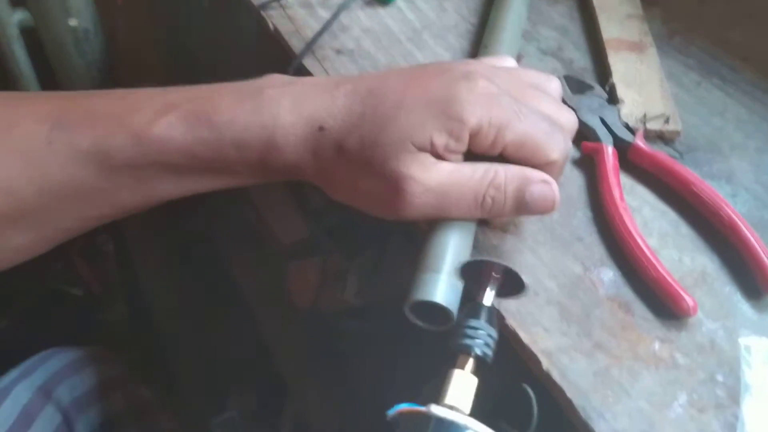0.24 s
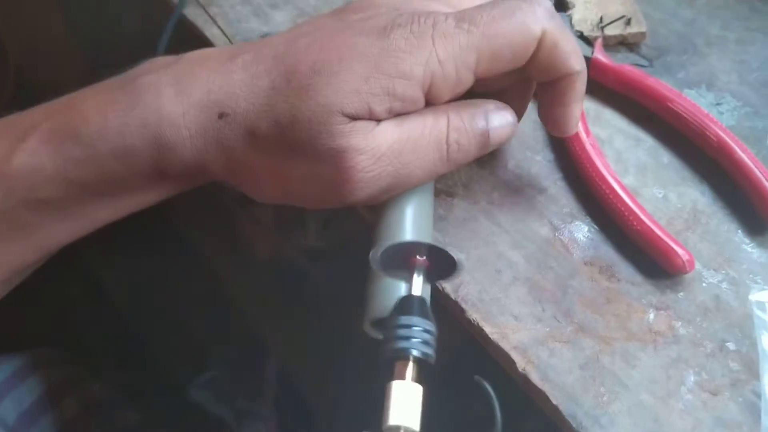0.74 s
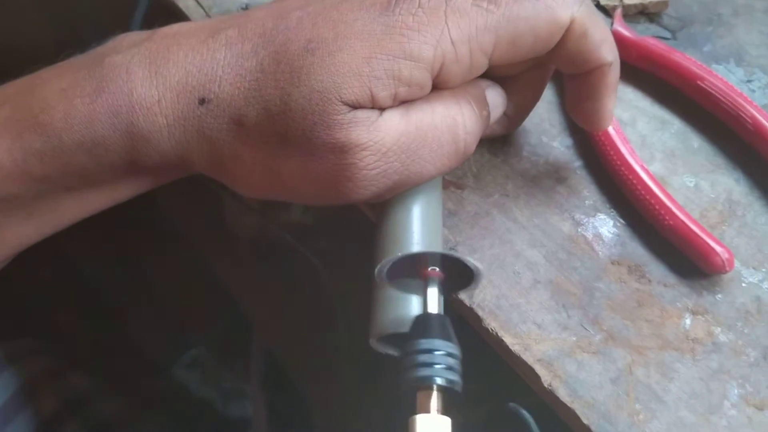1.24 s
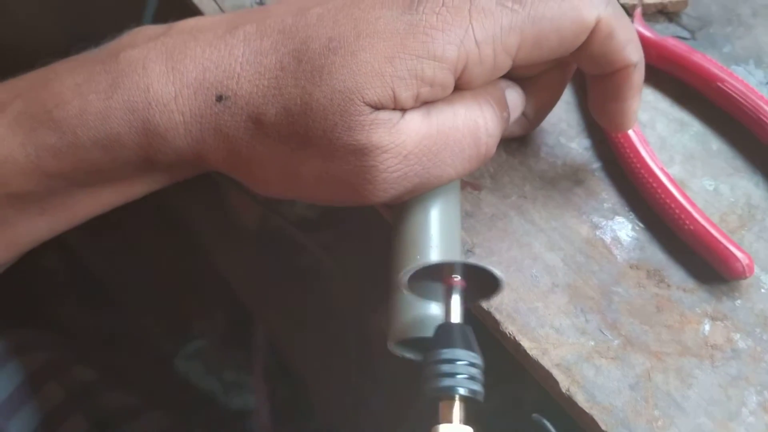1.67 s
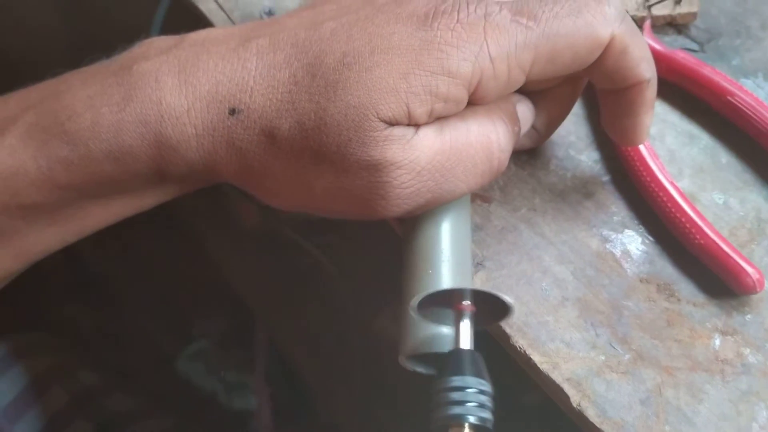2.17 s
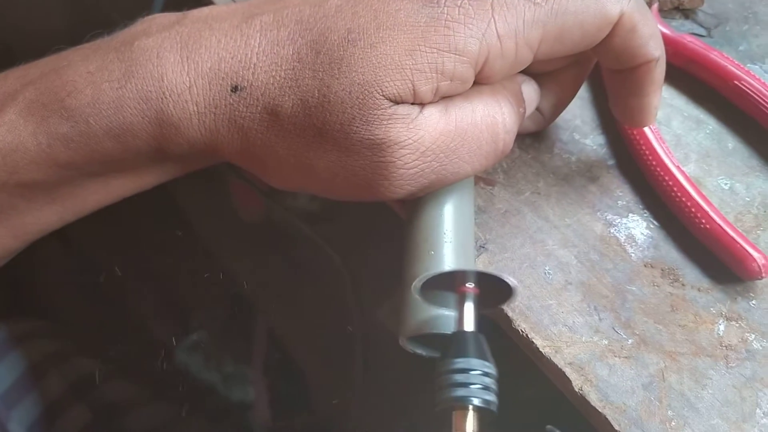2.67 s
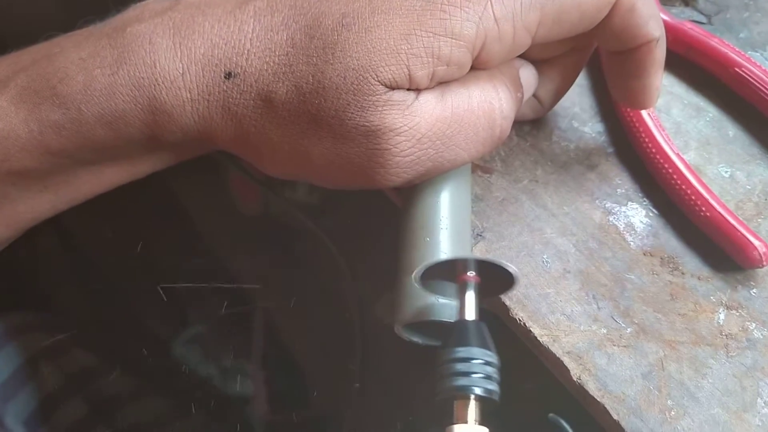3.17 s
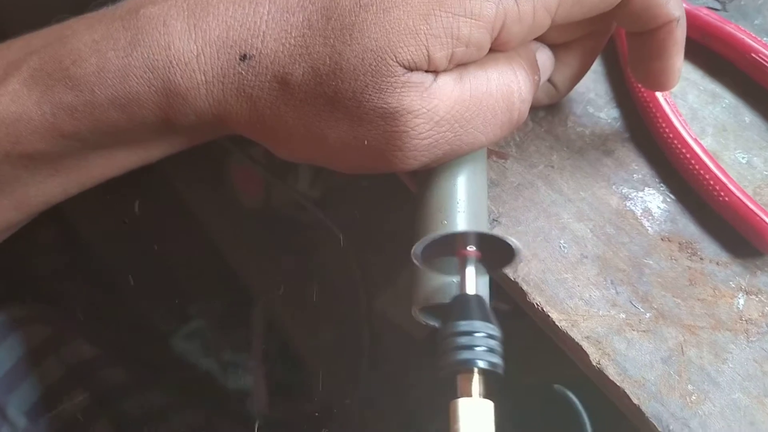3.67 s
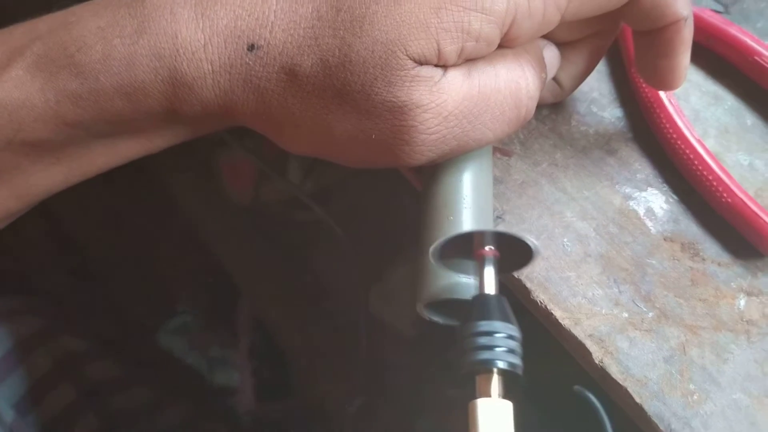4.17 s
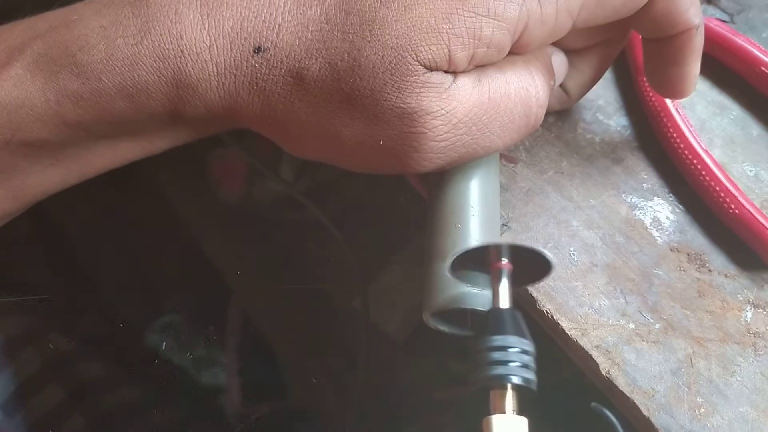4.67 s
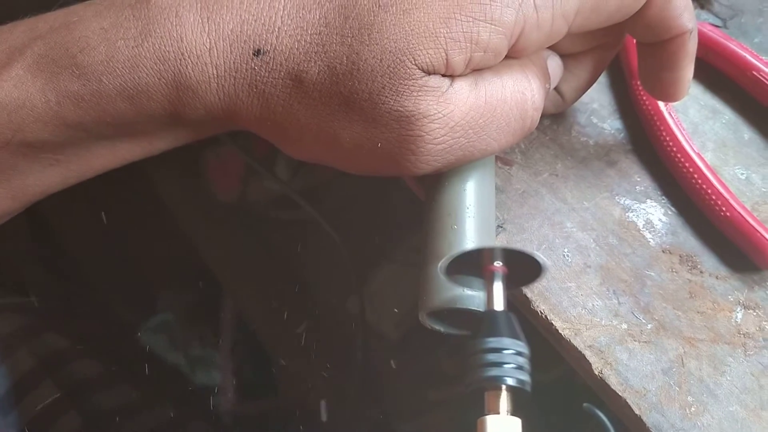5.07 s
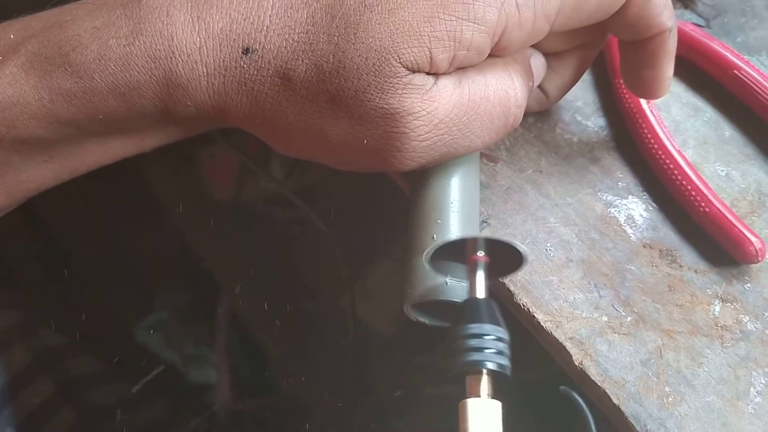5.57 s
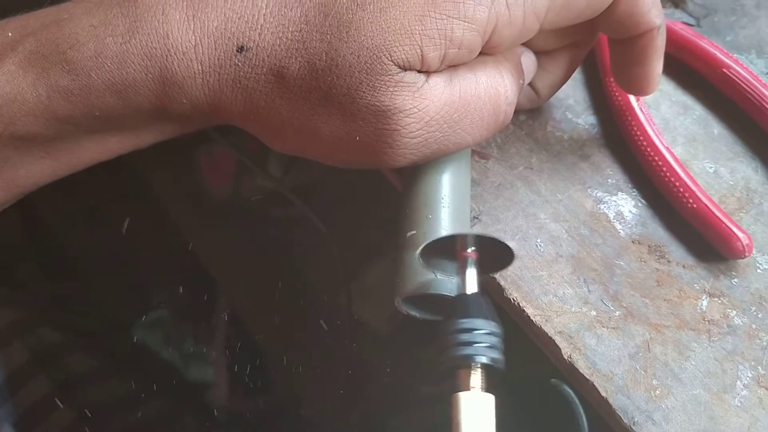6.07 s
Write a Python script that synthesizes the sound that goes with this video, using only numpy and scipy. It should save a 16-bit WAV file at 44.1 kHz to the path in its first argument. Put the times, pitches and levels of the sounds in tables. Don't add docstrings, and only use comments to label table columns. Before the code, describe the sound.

Steady motor brush whine and light handling knocks come first, close to a phone in a small hard room. A quick scraping touch leads to a harsh cut: dozens of sharp bites a second, shrill metallic rim squeal over the hollow knocking of plastic pipe. It sags in pitch, breaks into irregular clatter, then whines freely for a moment before a longer, louder grinding cut that ends bouncing.

```python
import sys
import numpy as np
from scipy import signal
from scipy.fft import rfft, irfft, next_fast_len
from scipy.io import wavfile
from scipy.ndimage import uniform_filter1d, minimum_filter1d, map_coordinates

SR = 44100
rng = np.random.default_rng(int(sys.argv[2]) if len(sys.argv) > 2 else 0)


def elevation(decibels):
    levels = np.asarray(decibels, float)
    return 10 ** (levels / 20)


def materialize(psi):
    bounded = np.clip(np.atleast_2d(psi).T, -1, 1)
    quanta = np.round(bounded * 32767).astype(np.int16)
    wavfile.write(sys.argv[1], SR, quanta)


N = 279153
TIME = np.arange(N) / SR
FREE_SPEED = 74

# start_s, speed [turns per s]
CUT_SPEEDS = [
    [(2.29, 69.94), (2.38, 74.52), (2.58, 69.6), (2.96, 61.61), (3.17, 53.29), (3.23, 43)],
    [(3.58, 54.6), (3.65, 69.33), (3.725, 71.91)],
    [(4.205, 73.47), (4.345, 72.57)],
    [(4.38, 79.19), (4.54, 69.4), (4.99, 57.71), (5.38, 56.43), (5.46, 67.45), (5.64, 56.25), (5.76, 47.67),
     (5.806, 49.3)],
]
# start_s, slot_ring_db, chip_hiss_db, lean_left_db
SLOT_MOVES = [(1.88, -2.5, 3, -0.5), (2.3, -2.5, 0, 0), (2.55, -4.5, 1, 1.5), (2.75, -0.5, -0.5, 1),
              (2.95, 0, 0.5, 1.5), (3.15, -1, -2, 0), (3.35, -14, -0.5, 0), (3.55, -1, 0, -1),
              (3.8, 0, 1.5, 2), (4.25, 7.5, -5, 0.5), (4.55, 1, 2.5, 0), (4.75, 6.5, 0, -2.5),
              (5.15, 2, -1, 1), (5.35, 5.5, 1, 0), (5.55, -1, 1, 1.5), (5.75, -5.5, 0, 0.5),
              (6.1, -5, 3, 0), (6.3, -1, 6, 1)]


def unit(x):
    return x / np.sqrt(np.mean(x ** 2) + 1e-20)


def along(points, hz):
    f, v = np.transpose(points)
    return np.interp(np.log(hz + 1), np.log(f + 1), v)


def wobble(rate):
    return map_coordinates(rng.standard_normal(int(N * rate / SR) + 4), [TIME * rate])


def filtered(x, response):
    m = next_fast_len(N + SR // 2)
    return irfft(rfft(x, m) * response(np.fft.rfftfreq(m, 1 / SR)), m)[..., :N]


def resonate(x, modes):
    def shape(f):
        total = 0
        for k, (centre, width, db) in enumerate(modes):
            damping = max(width, centre / 36 * (centre < 11000))
            total = total + (-1) ** k * elevation(db) * 1j * f * width / (centre ** 2 - f ** 2 + 1j * f * damping)
        return total
    return filtered(x, lambda f: shape(f) / np.sqrt(np.mean(abs(shape(f)) ** 2)))


def shaft():
    # start_s, speed [turns per s]
    idle = [(0, 74.83), (1.87, 74.78), (1.93, 73.6), (2.1, 74.65), (2.28, 74.75), (3.5, 50), (3.9, 74.6),
            (4.19, 74.9), (6.33, 46)]
    return np.interp(TIME, *np.transpose(sorted(idle + sum(CUT_SPEEDS, []))))


def ports(x, send):
    # pitch_hz, left_minus_right_db
    lean = [(60, 13.5), (130, -3), (290, 4), (600, -3), (1300, 3.5), (2600, 6.5), (5000, 2), (8400, 1),
            (12000, 2.5)]
    # pitch_hz, left_lead [rad]
    lead = [(100, 0), (1030, -.1), (1980, -1.3), (2930, -.5), (4000, -2.5), (5250, -2.7), (7240, .2),
            (8530, 0), (11200, -1.5)]
    # pitch_hz, t60_s
    room = [(200, 1), (1000, 0.53), (3000, 0.48), (8000, 0.34), (14000, 0.045)]
    half = np.array([[.5], [-.5]])
    direct = filtered(x, lambda hz: elevation(half * along(lean, hz)) * np.exp(1j * half * along(lead, hz)))
    hz, t, z = signal.stft(rng.standard_normal((3, 2, SR // 2)), SR, nperseg=256)
    late_tail = elevation(-60 * t / along(room, hz)[:, None])
    bench_echoes = elevation(10.5 - 60 * t / 0.024)
    side = elevation(half[:, :, None] * along(lean, hz)[:, None])
    tails = signal.istft(z * (late_tail + bench_echoes) * side, SR, nperseg=256)[1]
    tails = tails / np.sqrt(np.sum(tails ** 2) / 6)
    paths = np.array([wobble(6) for _ in tails])
    sends = np.pad(send * paths / np.linalg.norm(paths, axis=0), ((0, 0), (60, 0)))
    echoes = signal.fftconvolve(sends[:, None], tails, axes=2).sum(axis=0)
    return direct + echoes[:, :N]


def air():
    # pitch_hz, level [dB per Hz]
    hush_colour = [(12, -30), (20, 7.5), (150, -3), (400, -9.5), (900, -17), (1400, -17.5), (4000, -11.5),
                   (8400, -17.5), (12400, -40), (15500, -47)]
    # start_s, level_db
    puff_list = [(0.02, -52), (.54, -56), (1.02, -52), (1.85, -62), (2.75, -47), (3.0, -38), (3.4, -41),
                 (3.631, -39), (4.23, -47), (4.48, -48), (4.74, -53), (4.93, -38.5), (5.18, -48),
                 (5.48, -37), (5.59, -45), (6.02, -42)]
    draught_colour = [(12, -52), (25, 3.0), (60, 10.5), (110, 1.0), (200, -3.0), (400, -120)]  # Hz, dB
    hiss = rng.standard_normal((2, N)) + 1.45 * rng.standard_normal(N)
    hush = unit(filtered(hiss, lambda hz: elevation(along(hush_colour, hz))))
    low = rng.standard_normal((2, N)) + 3.6 * rng.standard_normal(N)
    draught = unit(filtered(low, lambda hz: elevation(along(draught_colour, hz))))
    steady = elevation(-61 + .2 * (FREE_SPEED - shaft()) + 2 * wobble(14))
    puff_s = .02
    puffs = sum(elevation(db) * np.exp(-((TIME - s) / puff_s) ** 2) for s, db in puff_list)
    return elevation(-54.5) * hush + (steady + puffs) * elevation(np.array([[1.5], [-1.5]])) * draught


def bench():
    # start_s, peak_db, pitch_hz, t60_s, crack_db (against the ring)
    knocks = [(0.036, -42, 362.5, 0.25, 9.5), (0.07, -43.5, 343, 0.15, -10),
              (0.084, -33, 2610, 0.0092, -1.5), (0.471, -59, 315, 0.31, 23),
              (.556, -25.5, 9150, 0.011, -18), (.556, -31.5, 7000, 0.011, -18),
              (0.649, -34.5, 752, 0.054, 4), (0.912, -48, 382, 0.17, 6), (0.996, -33, 220, 0.049, -26),
              (0.995, -37.5, 2450, 0.04, -2), (1.667, -53, 210, 0.043, -3)]
    # start_s, pitch_hz, level_db
    creak_path = [
        (3.999, 795, -95),
        (4.02, 778, -51),
        (4.075, 777, -55.5),
        (4.09, 670, -54),
        (4.12, 680, -68),
    ]
    out, t = np.zeros(N + SR), np.arange(SR // 2) / SR
    for s, db, hz, t60, crack_db in knocks:
        spread = [[.075 if hz < 5000 else .025], [.3]]
        ratio, life = np.exp(rng.normal(0, spread, (2, 9))[..., None])
        ring = np.sum(np.sin(2 * np.pi * hz * ratio * t) * elevation(-2 - 60 * t / (t60 * life)), axis=0)
        noise = uniform_filter1d(uniform_filter1d(rng.standard_normal(len(t)), size=9), size=9)
        crack = noise * elevation(crack_db - 60 * t / 0.24)
        onset = (1 - np.exp(-t / (.0015 + 1.2 / hz))) ** 2
        out[round(s * SR):][:len(t)] += elevation(db) * (ring + crack) * onset
    s, hz, db = np.transpose(creak_path)
    creak_level = elevation(np.interp(TIME, s, db, -120, -120) + 1.5 * wobble(48))
    creak = creak_level * np.sin(2 * np.pi * np.cumsum(np.interp(TIME, s, hz)) / SR)
    sound = out[:N] + creak
    return ports(sound, elevation(-4.0) * sound)


def motor():
    # start_s, level_db
    whine_level = [
        [(0.0, -44.5), (0.568, -45), (1.014, -46), (1.538, -45.5), (1.86, -46.5)],
        [(2.05, -45.5), (2.28, -47.5)],
        [(3.95, -46), (4.19, -45.5)],
    ]
    # pitch_hz, level [dB per Hz]
    whine_colour = [(240, -70), (400, -50), (860, -23), (3700, -19), (4100, -14.5), (4700, -21),
                    (6500, -7.5), (8200, 1.5), (9500, -1.5), (10300, -7.5), (12500, -18), (15500, -30)]
    # shaft_order, far_db, near_db (over their neighbours, tool far or near)
    strong = [(15, 14, 20), (19, 0, 6), (20, 6, 12), (22, -4, -6), (26, -8, -1), (28, -2, -10), (30, 2, 7),
              (37, 1, -8), (38, 4, 6), (39, 1, -8), (40, -4, -8), (41, 0, 7), (42, -8, 0), (43, -4, 6),
              (44, 1, 10), (47, -11, -17), (49, 1, -10), (52, -8, -17), (54, 2, 6), (55, 11, 6), (57, 1, 9),
              (59, -13, -2), (61, -2, -7), (62, 10, 0), (63, -5, -25), (64, -5, -9), (66, 0, 7),
              (67, -11, -17), (68, 14, 7), (69, -7, -15), (70, 4, -7), (71, 9, 5), (72, -7, -19),
              (74, 8, 8), (75, -15, 0), (78, -7, -7), (79, -21, -7), (82, 4, 10), (84, -2, -15),
              (85, -27, -2), (92, -13, 1), (95, -8, -7), (96, 0, -9), (97, -11, -2), (103, 4, 6),
              (106, -5, -6), (107, -18, -1), (110, 14, 8), (114, 1, -9), (118, -3, -9), (121, -4, -11),
              (125, 4, 10), (129, 1, 6), (130, 3, 6), (134, -8, -5), (140, 3, 6)]
    # start_s, upper_whine_db
    vents = [(0, -12), (.5, -12), (.67, -5.5), (1.08, 0), (1.56, 0), (1.86, -1.5), (2.28, -2), (4.19, -1.5)]
    turns = np.cumsum(shaft()) / SR
    order = np.arange(8193)
    db = along(whine_colour, order * 73.3) + 1.5 * rng.standard_normal((3, 2, 8193))
    for k, far_db, near_db in strong:
        db[..., round(k)] += np.clip([[far_db], [near_db], [near_db]], -20, 16 if k < 30 else 10)
    phase = rng.uniform(0, 2 * np.pi, 8193)
    phase = phase + .6 * rng.standard_normal((2, 8193)) + .5 * rng.standard_normal((3, 2, 8193))
    turn = unit(irfft(elevation(db) * np.exp(1j * phase) * (order < 205)))
    place = (turns % 1 * turn.shape[-1]).astype(int)
    far_level = np.interp(TIME, [.3, .95], [14, -20])
    drift = elevation([far_level, 4 * wobble(0.085), 4 * wobble(11.0)])
    drift = drift / np.linalg.norm(drift, axis=0)
    comb = np.sum(turn[:, :, place] * drift[:, None], axis=0)
    hiss = unit(filtered(rng.standard_normal((2, N)), lambda hz: elevation(along(whine_colour, hz))))
    vent_hz, vent_width_hz = 8930, 1450
    vent = filtered(comb, lambda hz: np.exp(-((hz - vent_hz) / vent_width_hz) ** 2))
    comb = comb + (elevation(np.interp(TIME, *np.transpose(vents))) - 1) * vent
    level_db = np.interp(TIME, *np.transpose(np.vstack(whine_level)))
    return elevation(level_db + np.array([[3], [-2]])) * (comb + elevation(-9.5) * hiss)


def ping():
    # start_s, level_db
    glances = [(1.895, -39), (2.545, -25), (3.4212, -42), (3.566, -25), (3.646, -34), (3.784, -36),
               (5.445, -22)]
    ping_hz, t60_s = 7628, .35
    start, db = np.transpose(glances)[:, :, None]
    since = TIME - start
    level = np.sum((since > 0) * elevation(db - 60 * abs(since) / t60_s), axis=0)
    tone = np.sin(2 * np.pi * ping_hz * TIME + 0.44 * wobble(35))
    return level * elevation(1.5 * wobble(37)) * tone * np.ones((2, 1))


def bites():
    start_turn = (.568, -.124, .424, .164)
    # start_s, pressure_db, depth_db
    hand_moves = [
        [(2.31, -17.5, -9), (2.33, -17.5, -21.5), (2.46, -17.5, -17), (2.49, -18, -10.5), (2.56, -19, -7.5),
         (2.63, -14, -19.5), (2.86, -17, -13), (2.96, -15, -16), (3.23, -15, -15)],
        [(3.6, -17, -26), (3.65, -16, -17), (3.7, -29, -46)],
        [(4.22, -17.5, -26.5), (4.3, -18.5, -27.5), (4.34, -28, -32)],
        [(4.389, -28, -25), (4.403, -15.5, -29), (4.47, -15.5, -16), (4.55, -17, -14.5), (4.85, -16, -16.5),
         (5.02, -14.5, -23.5), (5.3, -13, -21), (5.55, -13.5, -15), (5.8, -18.5, -12)],
    ]
    # start_s, peak_db, depth_db, arc_ms
    touches = [(1.8802, -5.5, -8.5, 0.43), (1.8937, -4.5, -11.5, 1.8), (1.9078, -19, -8, 2.8),
               (3.7709, -8, -29, 0.74), (3.7826, -8, -15, 2.1), (3.7966, -36, -21, 1.9)]
    # start_s, peak_db, depth_db, arc_ms
    first_bounces = [(3.238, -5, -23, 2.3), (3.2432, -3, -14, 2.4), (3.258, -12, -12.5, 4.5),
                     (3.2652, -5, -15, 2.4), (3.281, -17, -19, 2), (3.2848, -4, -18, 3.3),
                     (3.298, -12, -12, 7.1), (3.3255, -36, -14, 2.9), (3.339, -5.5, -14.5, 2.7),
                     (3.3438, -7, -14, 1.2), (3.364, -15, -28, 3.1), (3.3787, -6.5, -13, 4.3),
                     (3.4212, -8.5, -13, 5.2), (3.4635, -7, -12.5, 3.3), (3.468, -10.5, -16.5, 3.8),
                     (3.5067, -4, -11, 2.3), (3.5465, -7.5, -12.5, 2.7), (3.5505, -11, -15, 2.5),
                     (3.564, -9.5, -23, 5.3), (3.5873, -34, -32, 2.4)]
    # start_s, peak_db, depth_db, arc_ms
    last_bounces = [(5.8141, -7.5, -18, 4.1), (5.833, -3.5, -10, 1.9), (5.855, -6, -26, 3.4),
                    (5.868, -8.5, -10.5, 4.2), (5.9062, -6, -16, 1.5), (5.9098, -12, -8, 2.9),
                    (5.928, -8.5, -17, 2.8), (5.9439, -8, -11.5, 2.6), (5.9651, -7.5, -38, 2.1),
                    (5.981, -1, -7, 0.23), (6.0013, -7, -57, 4.9), (6.017, -17, -7, 4.3),
                    (6.04, -1.5, -16, 0.78), (6.055, -10.5, -12, 4.2), (6.08, -22, -12, 1.2),
                    (6.0943, -5.5, -12.5, 2.1), (6.1184, -4, -26, 1.14), (6.1322, -11, -11, 2.3),
                    (6.164, -11.5, -23, 3.9), (6.178, -8, -23, 3.5), (6.2209, -8.5, -16.5, 5.4),
                    (6.2425, -11.5, -26, 5.9), (6.262, -6, -16, 4.1), (6.285, -2, -31, 2),
                    (6.303, -8, -20, 8.4), (6.3254, -35, -13, 2.9)]
    # start_s, level_db (over the usual bite)
    uneven = [(2.326, -2), (2.366, -2.5), (2.407, 2), (2.421, 0), (2.449, -6), (2.503, 1.5), (2.517, -1.5),
              (2.603, 0.5), (2.736, -3.5), (2.75, 1), (2.766, -4.5), (2.78, 1.5), (2.81, 1.5),
              (2.857, -0.5), (2.904, 2.5), (2.969, -4), (2.986, -1), (3.02, -2.5), (3.104, -3), (3.161, -3),
              (3.615, 2), (3.631, -0.5), (3.646, 4.5), (3.661, -1), (3.691, 1), (4.228, 1.5), (4.241, -1),
              (4.255, 1), (4.296, -0.5), (4.431, -3.5), (4.471, -0.5), (4.583, 4.5), (4.627, 3),
              (4.673, -9), (4.688, 2.5), (4.765, -1), (4.783, -2.5), (4.843, 4), (4.861, -13), (4.895, 0),
              (4.927, 0.5), (4.961, -2.0), (5.047, -1.5), (5.116, -1.5), (5.294, -3), (5.348, 1),
              (5.383, -6.5), (5.415, -9.5), (5.43, -3), (5.461, -5.5), (5.476, 0.5), (5.587, 0.5),
              (5.817, -9)]
    rows = []
    for table, load in ((touches, -1.2), (first_bounces + last_bounces, 7.9)):
        for s, db, depth_db, ms in table:
            energy_db = db - 31.5 + 10 * np.log10(ms)
            rows.append((s, energy_db, 0, depth_db, load, ms / 1000))
    for speeds, first, hand in zip(CUT_SPEEDS, start_turn, hand_moves):
        s, rate = np.transpose(speeds)
        t = TIME[(TIME > s[0]) & (TIME < s[-1])]
        turns = first + np.cumsum(np.interp(t, s, rate)) / SR
        middle = np.interp(np.arange(1, int(turns[-1]) + 1), turns, t)
        speed = np.interp(middle, s, rate)
        load = np.clip(FREE_SPEED - speed, 0, 30)
        luck = rng.standard_normal((len(middle), 3)) * np.clip(.5 + load / 16, 0, 1.1)[:, None]
        arc = .0026 + .00022 * load
        when, press_db, depth_db = np.transpose(hand)
        jitter_s = (.0001 + .00004 * load) * luck[:, 1]
        start = middle - arc / 2 - .0008 + jitter_s
        energy_db = np.interp(middle, when, press_db) - 10 * np.log10(speed)
        energy_db += sum(db * (abs(middle - at) < .45 / speed) for at, db in uneven)
        depth = np.interp(middle, when, depth_db)
        rows += list(zip(start, energy_db, .8 * luck[:, 2], depth, load, arc * elevation(1.9 * luck[:, 0])))
    start, energy_db, rim_db, depth_db, load, arc = np.transpose(rows)
    edge_db = -4.5 + 0.78 * depth_db + 0.21 * load
    boom_db = -12 + 0.64 * depth_db + 0.74 * np.minimum(load, 12.8)
    scatter_db = 2.4 * load / 14 * rng.standard_normal((len(arc), 3)).T
    pipe_db = np.array([edge_db, depth_db, boom_db]) - rim_db + scatter_db
    return np.array([start, energy_db + rim_db, *pipe_db, arc]).T


def held(x):
    # start_s, pitch_hz
    seat = [(2.3, 990), (2.45, 1170), (2.54, 970), (2.6, 746), (2.67, 1010), (2.79, 780), (3.3, 1070),
            (3.36, 845), (3.52, 975), (4.2, 1370), (4.4, 1320), (4.55, 1040), (4.94, 770), (5.03, 1370),
            (5.68, 870), (5.98, 1220), (6.17, 730), (6.3, 970)]
    seat_db, seat_octaves, patchy_db = 4.5, 0.23, 2
    slot_hz, slot_width_hz, thud_hz = 4490, 420, 270
    hz, t, z = signal.stft(x, SR, nperseg=512)
    hz = hz[:, None]
    seat_hz = np.interp(t, *np.transpose(seat))
    field = uniform_filter1d(rng.standard_normal(z.shape[1:]), size=3, axis=0)
    field = uniform_filter1d(field, size=14, axis=1)
    db = seat_db * np.exp(-(np.log2((hz + 1) / seat_hz) / seat_octaves) ** 2) + patchy_db * unit(field)
    when, slot_db, chip_db, _ = np.transpose(SLOT_MOVES)
    slot_ring = np.exp(-((hz - slot_hz) / slot_width_hz) ** 2)
    chip_band = (hz > 3300) & (hz < 6960)
    db += slot_ring * np.interp(t, when, slot_db)
    db += (1 - slot_ring) * chip_band * np.interp(t, when, chip_db)
    lost_speed = np.clip(FREE_SPEED - np.interp(t, TIME, shaft()), 0, 25)
    db += -.45 * (hz < thud_hz) * lost_speed
    return signal.istft(z * elevation(db), SR, nperseg=512)[1][:, :N]


def disc():
    # pitch_hz, width_hz, level_db
    disc_modes = [(6770, 16, 4), (7570, 550, -7.5), (8000, 120, -41), (8200, 170, -55), (9064, 337, 2),
                  (9144, 1750, -7.5), (11850, 770, -18), (13100, 120, -32), (13800, 570, -27.5)]
    # pitch_hz, width_hz, level_db
    skin_modes = [(1836, 120, -6.5), (2450, 460, -6.5), (2862, 283, -2.5), (3968, 1110, -10.5),
                  (4360, 590, -5.5), (5290, 1100, -14)]
    # pitch_hz, width_hz, level_db
    wall_modes = [(734, 144, 0), (951, 24, 3), (1041, 76, -0.5), (1242, 34, 4), (1321, 46, -2),
                  (1640, 220, -2.5)]
    # pitch_hz, width_hz, level_db
    boom_modes = [(149.6, 7.9, -12), (220.7, 10.6, -3), (336.7, 42, -3), (400.6, 6.2, 5), (452.8, 17, -5),
                  (560.6, 12, -2)]
    # pitch_hz, width_hz, level_db
    crack_modes = [(3780, 570, 2), (5080, 1000, -5), (6630, 400, 0.5)]
    # start_s, pitch_hz
    squeal_path = [(1.9, 8240), (2.3, 8390), (2.45, 8180), (2.6, 8410), (2.75, 8270), (2.9, 8370),
                   (3.55, 8425), (3.62, 8430), (3.79, 8150), (4.2, 8510), (4.4, 8210), (4.6, 8320),
                   (5.03, 8420), (5.68, 8390), (6.0, 8330), (6.3, 8050)]
    # start_s, boom_freed_db, edge_freed_db, trailing_rub [share 0-1]
    grip_moves = [(1.88, 2, 0.5, 0.23), (2.3, -2, 0.5, 0.21), (2.55, 1.5, 0.5, 0.24), (2.75, -1.5, 2, 0.47),
                  (2.95, -4, -1, 0.07), (3.2, -3, 1, 0.7), (3.4, 3, 3, 0.34), (3.65, -0.5, 3, 0.48),
                  (3.8, -3.5, 6, 0.01), (4.25, -3.5, 5.5, 0.14), (4.5, -0.5, -1, 0.4),
                  (4.8, -1.5, -2, 0.26), (5.1, -3, 3.5, 0.5), (5.4, -0.5, -3, 0.52), (5.7, -1.5, -4, 0.8),
                  (5.9, 3, 5, 0.16), (6.1, 0.5, 3, 0.15), (6.3, 3.5, 6, 0.8)]
    start, energy_db, edge_db, wall_db, boom_db, arc = bites().T[:, :, None]
    t = np.arange(1024) / SR
    grip = (1 - np.exp(-t / ((.11 + 26 * arc) * arc))) * np.exp(-(t / arc) ** 3)
    slips = uniform_filter1d(uniform_filter1d(rng.standard_normal(grip.shape), size=50), size=50)
    grip = grip * elevation(3 * np.clip(arc / .005, 0, 1) * unit(slips))
    when, *held_by = np.transpose(grip_moves)
    free_db, open_db, rub = [np.interp(start, when, c) for c in held_by]
    shape = grip + np.clip(rub, 0, 1) * np.exp(-t / .009)
    scale = elevation(energy_db) / np.sqrt(np.sum(shape ** 2, axis=1, keepdims=True) / SR)
    index = (np.round(start * SR).astype(int) + np.arange(1024)).ravel()

    def lay(rows, late):
        return np.bincount(index + round(late), rows.ravel(), N + 2048)[:N]

    luck = rng.standard_normal((len(arc), 2))
    flutter = unit(uniform_filter1d(rng.standard_normal(shape.shape), size=40))
    pitch_hz = np.interp(start, *np.transpose(squeal_path)) + 65 * luck[:, :1] + 110 * flutter
    turn = np.cumsum(pitch_hz, axis=1) / SR
    swell = uniform_filter1d(grip, size=24, origin=11)
    tone = swell * np.sin(2 * np.pi * turn) * (1 + .25 * flutter[::-1])
    squeal = lay(elevation(3) * scale * tone, 0)
    blow = (t < .5 / SR) * np.sqrt(arc * SR)
    cut_db = edge_db + open_db
    # modes, level dB, delay in samples, echo dB, share of blow, difference between ports
    bodies = ((disc_modes, -8, 0, -3, .1, .6),
              (skin_modes, cut_db, 70, -2, .3, .7),
              (wall_modes, wall_db, 60, -2, .75, .5),
              (boom_modes, boom_db + free_db, 80, -6, .8, .15),
              (crack_modes, cut_db - 10, 10, -4, .6, .6))
    rings = []
    for modes, db, late, wet_db, blow_share, apart in bodies:
        chips = rng.standard_normal((3, *shape.shape))
        force = []
        for c in chips[1:]:
            scrape = shape * (chips[0] + apart * c)
            force.append(lay(scale * elevation(db) * (blow_share * blow + (1 - blow_share) * scrape), late))
        ring = resonate(np.array(force), modes)
        rings.append([*ring, elevation(wet_db) * ring[0]])
    left, right, send = rings[0] + held(np.sum(rings[1:], axis=0))
    when, _, _, lean_left_db = np.transpose(SLOT_MOVES)
    lean_db = np.interp(TIME, when, lean_left_db)
    sound = ports(squeal + np.array([left, right]), send + elevation(-3.5) * squeal)
    return sound * elevation([lean_db / 2, -lean_db / 2])


def scene():
    return air() + bench() + motor() + ping() + disc()


def starved(x):
    # pitch_hz, level_db (against the nearby bands)
    floor = [(500, -40), (3200, -6.5), (3700, -3.5), (4400, -4), (6000, -4), (8500, -9), (10100, -5),
             (10800, 1), (11600, -1), (12400, 3), (13300, 6), (14300, -2), (15500, 6)]
    hz, _, z = signal.stft(x, SR, nperseg=2048)
    power = np.mean(abs(z[:, :1024].reshape(2, 128, 8, -1)) ** 2, axis=(0, 2))
    db = 10 * np.log10(power + 1e-20)
    luck = 2.4 * unit(uniform_filter1d(rng.standard_normal(db.shape), size=4, axis=1))
    luck[60:] = 4 * unit(uniform_filter1d(luck[60:], size=7, axis=0))
    kept = db - uniform_filter1d(db, size=19, axis=0) > along(floor, hz[4:1024:8])[:, None] + luck
    z[:, :1024] *= np.repeat(kept, 8, axis=0)
    return signal.istft(z, SR, nperseg=2048)[1][:, :N]


def gapped(x):
    gap_db, luck_db, from_hz = 12, 9, 3300
    hz, _, z = signal.stft(x, SR, nperseg=256)
    power = np.mean(abs(z[:, :128].reshape(2, 32, 4, -1)) ** 2, axis=(0, 2))
    db = 10 * np.log10(power + 1e-20)
    whole = 10 * np.log10(np.mean(abs(z) ** 2, axis=(0, 1)) + 1e-20)
    before, after = [-minimum_filter1d(-whole, size=13, origin=o) for o in (6, -6)]
    quiet = np.minimum(before, after) - whole > gap_db
    band = hz[2:128:4, None]
    weak = db - uniform_filter1d(db, size=9, axis=1) + 2 < luck_db * rng.standard_normal(db.shape)
    beside_rim = (band > from_hz) & ((band < 7000) | (band > 10000))
    z[:, :128] *= np.repeat(~(quiet & weak & beside_rim), 4, axis=0)
    return signal.istft(z, SR, nperseg=256)[1][:, :N]


def top_cut(x):
    return signal.sosfilt(signal.butter(12, 15940, fs=SR, output="sos"), x)


def record(dry):
    # pitch_hz, level_db
    port_colour = [(20, -3), (9300, 1.5), (10300, -3), (10900, -4.5), (11550, -3), (12300, 3.5),
                   (14000, -9.5), (16000, -12.5)]
    clipped = dry / (1 + abs(dry / .76) ** 5) ** (1 / 5)
    coloured = filtered(clipped, lambda hz: elevation(along(port_colour, hz)))
    heard = gapped(starved(coloured))
    return top_cut(np.clip(heard, -1, 1))


dry = scene()
out = record(dry)
materialize(out)
```